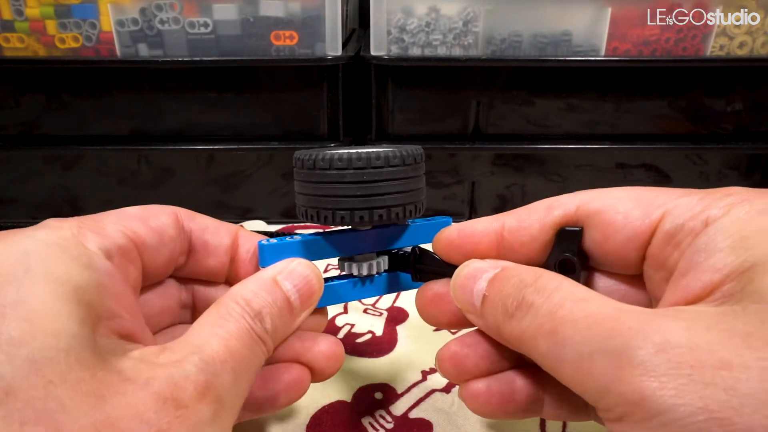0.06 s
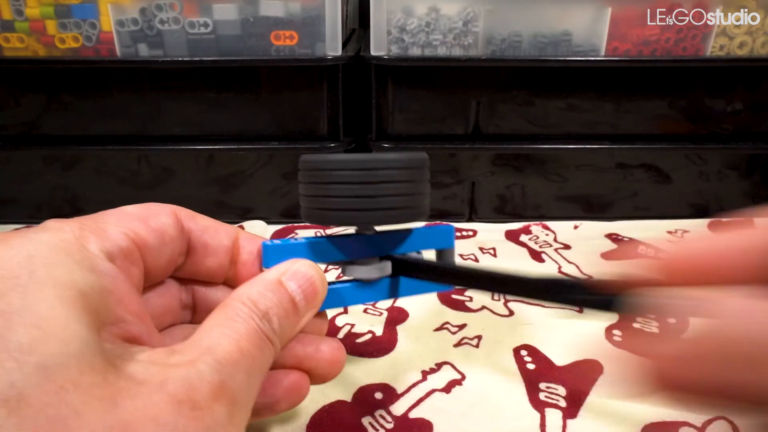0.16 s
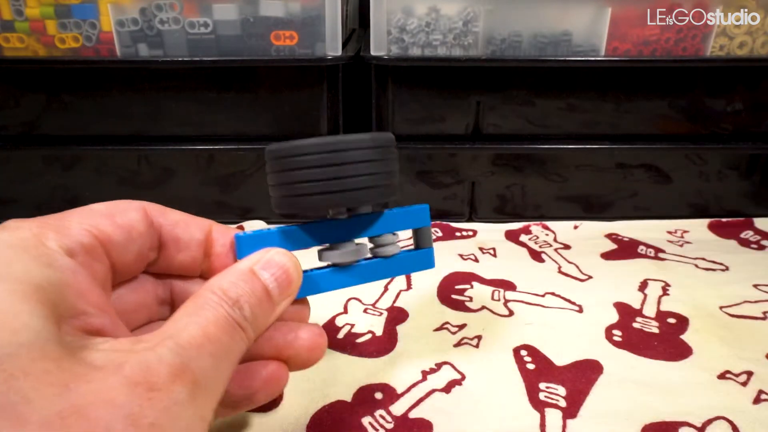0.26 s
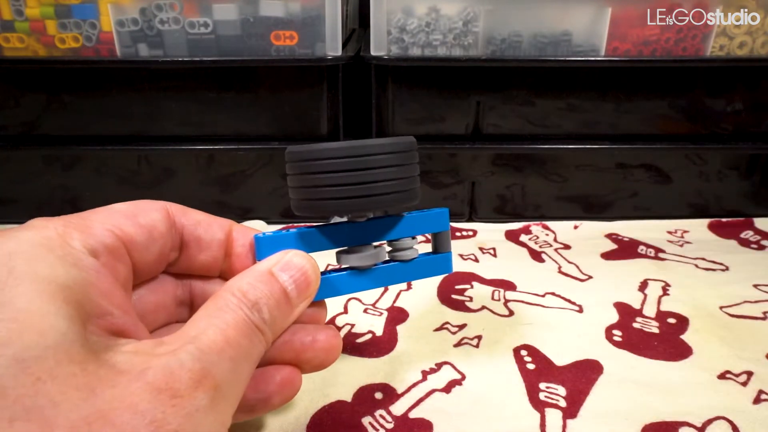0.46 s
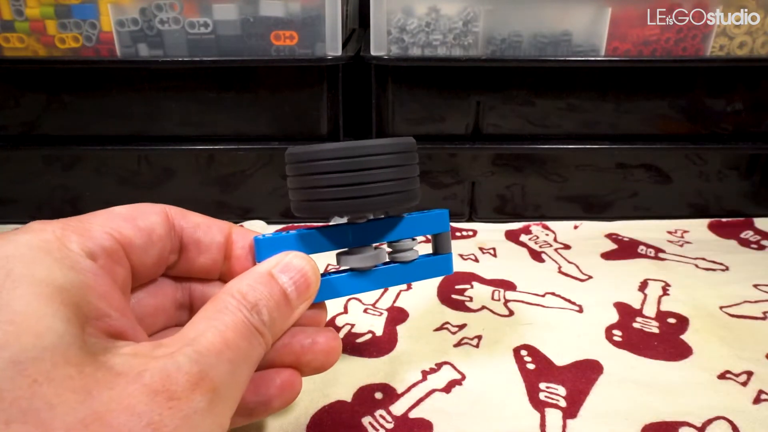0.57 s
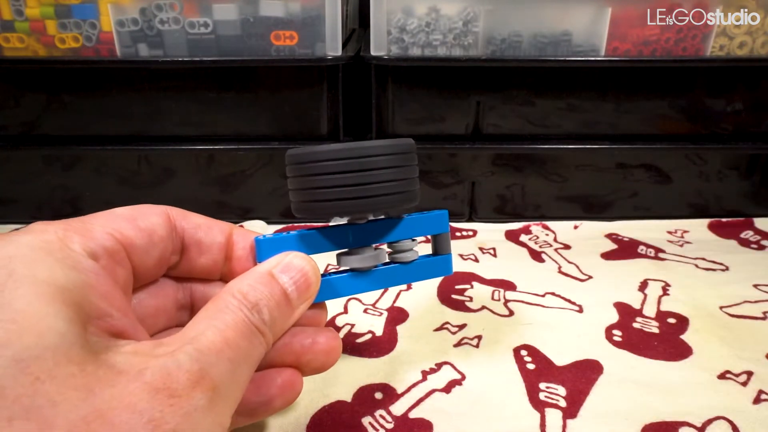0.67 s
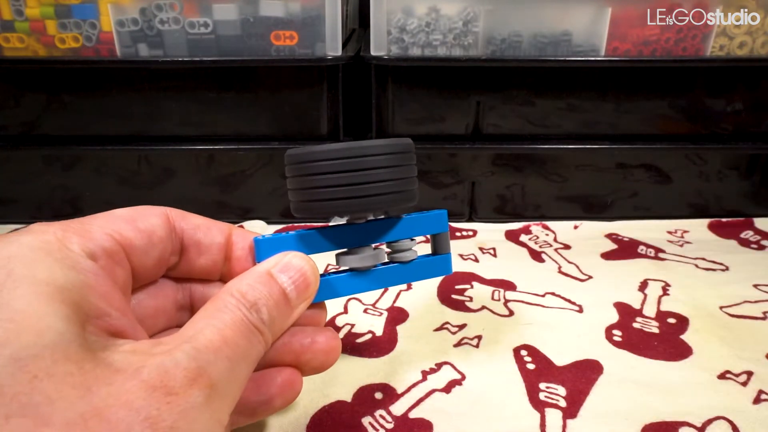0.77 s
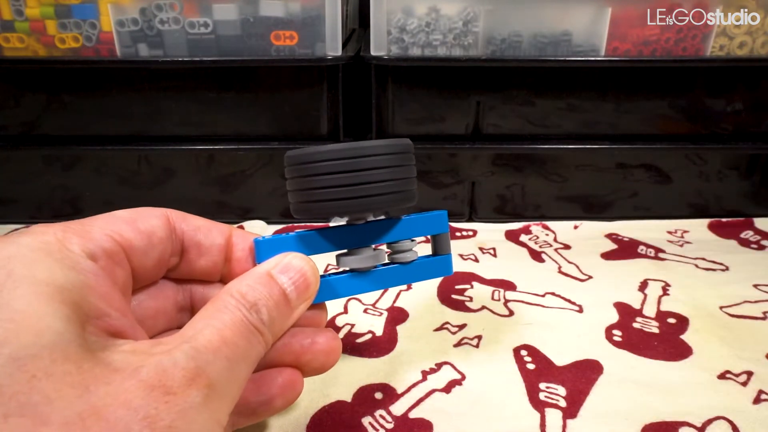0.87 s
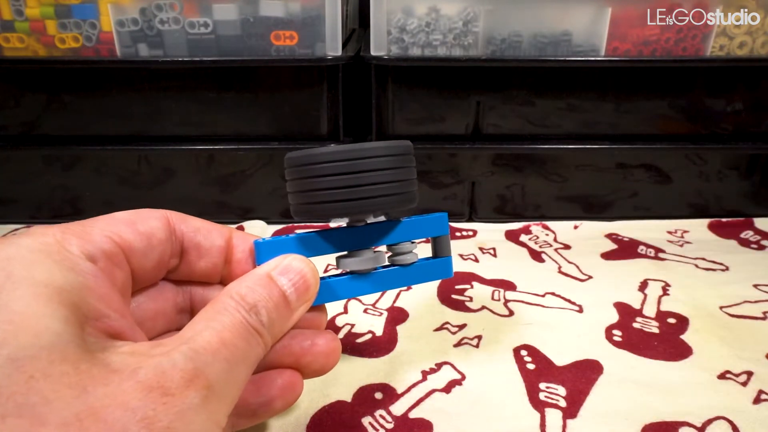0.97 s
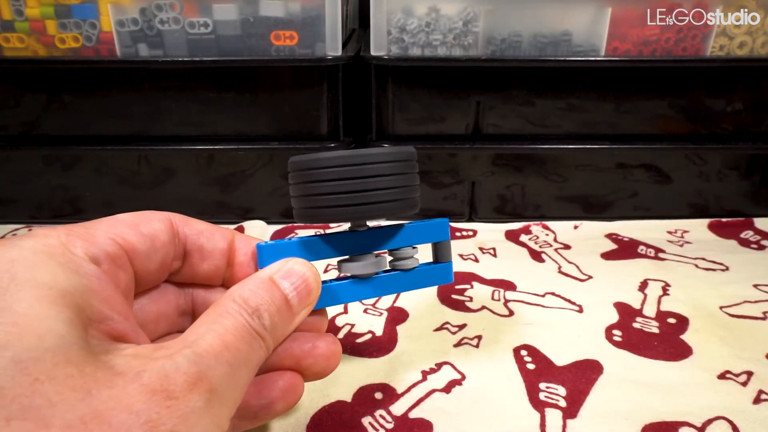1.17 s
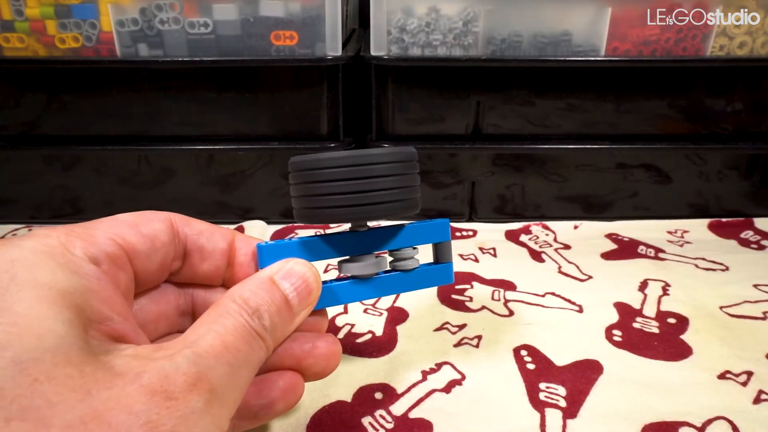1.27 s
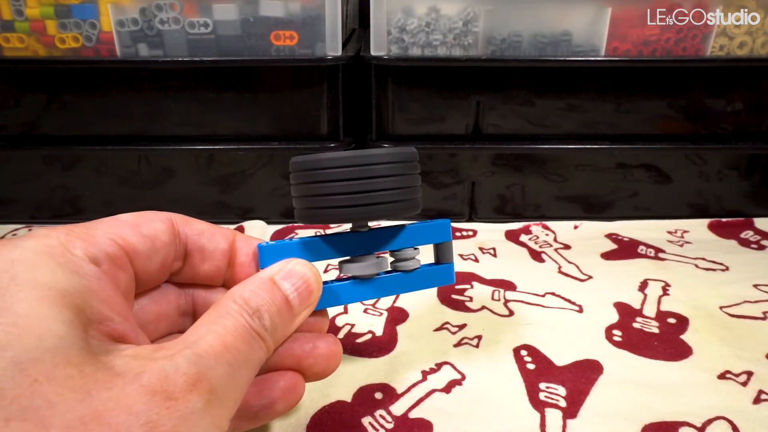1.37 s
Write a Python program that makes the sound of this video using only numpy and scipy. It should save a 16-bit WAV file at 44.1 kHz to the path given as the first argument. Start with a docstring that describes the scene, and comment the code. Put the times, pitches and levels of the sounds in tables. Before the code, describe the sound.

Plastic toy gears zip up fast, then a sharp click and steady rattling whir.

```python
"""A toothed plastic cord is yanked through the gears of a hand-held toy, close by in a small room.
Its teeth zip over a small gear ever faster; it comes free, and a sharp ringing click follows.
The wheel spins on, its loose gears chattering on every turn, while the hand bumps softly on the frame.
A low rumble and a faint hiss lie underneath."""
import sys
import numpy as np
from scipy import signal
from scipy.fft import rfft, irfft, next_fast_len
from scipy.io import wavfile

SR = 44100
rng = np.random.default_rng(int(sys.argv[2]) if len(sys.argv) > 2 else 0)


def wav_record(signal):
    """Record a signal, one row per channel, as 16-bit PCM in the file named by sys.argv[1]."""
    frames = np.transpose(np.atleast_2d(signal))
    bounded = np.clip(frames, -1, 1)
    # unit amplitude maps onto the largest positive 16-bit level
    quanta = np.round(bounded * 32767).astype(np.int16)
    wavfile.write(sys.argv[1], SR, quanta)


N = 61739
T = np.arange(N) / SR

# How strong the low and high pitches are in each sound: pitch_hz, level_db
RUMBLE_TONE = [(22, -39), (42, -0.5), (65, -5), (120, 2.5), (195, 3), (270, -4), (450, -7.5), (700, -7.5),
               (1500, -15.5), (4000, -36.5)]
HISS_TONE = [(100, -16.5), (600, -5), (1500, -12), (4000, -17.5), (15000, -22.5)]
SPIN_TONE = [(100, -30.5), (300, -7.5), (500, -6.5), (800, 5), (1150, -7.5), (1700, 1), (2600, -2),
             (3500, 0.5), (4800, -2), (5700, -3), (7200, -1.5), (8400, 2), (9300, -3), (10100, -2.5),
             (10800, -4), (13000, -9.5), (15500, -7.5)]
CLICK_TONE = [(300, -28), (1000, -14), (2400, -6), (3600, -16), (5600, -4), (8000, -3), (10300, 4),
              (12000, -6), (15500, -3)]
CLATTER_TONE = [(300, -25), (750, -5.5), (1030, 10), (1400, 1), (2200, 7), (3200, -2), (4200, 1.5),
                (7000, -5.5), (14000, -14.5)]
SLACK_TONE = [(80, -14), (220, 3), (450, -4.5), (850, -2), (1300, -11), (2000, -4.5), (3000, -23.5),
              (4600, -7.5), (7000, -34.5), (15000, -34)]
SKID_TONE = [(2000, -67), (6000, 19.5), (10000, 19.5), (13300, 18), (16000, 3.5)]
ZIP_TONE = [(50, -14), (100, -7.5), (200, -6.5), (330, -22), (560, -14), (760, 3), (900, 1.5), (1110, -9.5),
            (1400, 1), (2300, -3.5), (2750, 2), (3500, -3), (4370, 4.5), (5800, 4.5), (8900, -1),
            (10100, -0.5), (12000, -3), (13300, 2.5), (15500, -10.5)]

# The notes of the axle and the gears, each fading 60 dB in ring_s: pitch_hz, level_db, ring_s
AXLE_NOTES = [(778, -5, 0.042), (925.7, 1.5, 0.0202), (1575.6, 3, 0.075), (1937.5, 5, 0.00934),
              (3500, 4, 0.075), (4481, 1, 0.039), (5224, 4.5, 0.0424), (6952, 4, 0.054),
              (7484, 9.5, 0.00667), (7945, 1.5, 0.035), (10061, 5, 0.028)]
GEAR_NOTES = [(2740, -4, .04), (3263, -2, .07), (3937, 0, .07), (4283, -1, .06), (4616, -5, .06),
              (4974, -4, .04), (5829, -1, .05), (6615, -2, .04), (10785, -6, .05), (13306, -4, .04)]
# The click's thin, high ring lingering in the room: pitch_hz, level_db, ring_s
LINGERING_RING = [(1044, -10, .45), (10235, -1, .33), (10280, 0, .28), (10372, 1, .32), (10668, -1, .32),
                  (10790, -10, .32), (11320, -10, .32)]

# The hand bumps the frame: start_s, level_db, pitch_hz, fade_s
HAND_BUMPS = [(.245, -45, 165, 0.012), (0.276, -35, 321, 0.0085), (.44, -43.5, 126.1, 0.0219),
              (0.443, -48, 267.6, 0.053), (1.092, -44, 109, 0.014), (1.229, -47, 278, 0.063),
              (1.234, -54, 91.94, 0.253)]
# The frame is knocked: start_s, level_db
FRAME_KNOCKS = [(1.229, -37), (1.2585, -43)]
# Single teeth catch harder: start_s, level_db, pitch_hz
TOOTH_CATCHES = [(.5655, -32.5, 6790), (.583, -43.5, 7420), (.607, -51.5, 7100), (.64, -34, 4547),
                 (.697, -45.5, 7000), (.7015, -37, 7000), (0.741, -36, 7103), (0.7757, -35, 3535),
                 (.808, -59, 3500), (0.9005, -57.5, 7160), (.9615, -38.5, 3573), (.979, -49.5, 3562),
                 (1.039, -43.5, 3570), (1.1015, -38, 3560), (1.386, -36.5, 4729)]
# The wheel spins freely: time_s, turns_per_s, level_db
WHEEL_SPIN = [(.28, 66, -82.5), (.288, 66, -42.5), (.308, 66, -36.5), (.36, 66, -44.5), (.45, 65.5, -43),
              (.53, 65.2, -45), (.575, 68.34, -41.5), (.66, 57.7, -42.5), (.71, 65, -42),
              (.92, 70.13, -41.5), (1.07, 63.33, -42), (1.16, 64.7, -42), (1.4, 62.76, -43)]
# The freed cord's first touch, main hit and rebound: start_s, level_db, fade_s
CORD_HITS = [(.3765, -14.5, .0004), (.3771, -12, .0007), (.3842, -29, .003)]
# The note of the cord's free end: time_s, pitch_hz, level_db
CORD_CHIRP = [(.243, 2069, -69.5), (.256, 2702, -25.5), (.263, 3396, -25.5), (.269, 4359, -17.5),
              (.279, 5580, -57.5)]
# The cord's teeth skid hard: start_s, length_s, level_db
TOOTH_SKIDS = [(.209, .022, -37), (.2655, .007, -20), (.279, .004, -20.5)]
# The pull on the cord: time_s, teeth_per_s, level_db
CORD_PULL = [(.176, 160.6, -74.5), (.183, 250, -44.5), (.205, 401, -30.5), (.215, 531.5, -25),
             (.239, 572, -19.5), (.246, 730, -20.5), (.256, 760, -19.5), (.268, 890, -17.5),
             (.281, 910, -23), (.285, 1072.5, -21)]

ECHO_S = .003   # time scale of the nearest echoes
ZIP_PAN_DB, SPIN_PAN_DB = -.6, .06   # above zero leans left, below zero leans right


def from_db(db):
    """Turn decibels into a number to multiply by."""
    return 10 ** (np.asarray(db) / 20)


def rms_one(x):
    """Scale a sound so its average power is 1."""
    return x / np.sqrt(np.mean(x ** 2) + 1e-20)


def in_time(rows):
    """Join a table's points with straight lines, giving each column at every sample."""
    times, *columns = np.transpose(rows)
    return [np.interp(T, times, column) for column in columns]


def fade(start_s, fade_s):
    """A level that starts suddenly and dies away."""
    return (T >= start_s) * np.exp(-np.maximum(T - start_s, 0) / fade_s)


def blow(start_s):
    """A tap one sample long."""
    return 1. * (np.arange(N) == int(start_s * SR))


def let_through(x, kind, hz, order=2):
    """Keep the low pitches, the high ones or a band between."""
    return signal.sosfilt(signal.butter(order, hz, kind, fs=SR, output="sos"), x)


def colour(x, tone):
    """Shape a sound's low and high pitches with a tone table."""
    size = 2 * next_fast_len(N)
    hz, db = np.transpose(tone)
    grid_hz = np.maximum(np.arange(size // 2 + 1) * SR / size, 1)
    gain = rms_one(from_db(np.interp(np.log(grid_hz), np.log(hz), db)))
    # folding keeps the filter from sounding before a hit arrives
    fold = np.r_[1, np.full(size // 2 - 1, 2), 1, np.zeros(size // 2 - 1)]
    response = np.exp(rfft(irfft(np.log(gain)) * fold))
    return irfft(rfft(x, size) * response)[..., :N]


def ring(x, hz, ring_s):
    """Each tap starts a pure note that fades 60 dB in ring_s."""
    shrink = np.exp(-np.log(1000) / (ring_s * SR))
    angle = 2 * np.pi * hz / SR
    return signal.lfilter([0, np.sin(angle)], [1, -2 * shrink * np.cos(angle), shrink ** 2], x + 1e-18)


def tooth_hits(teeth_per_s, jitter, spread_db, scrape_s, snap):
    """Each tooth makes a snap and a short scrape, a little uneven in timing and strength."""
    passed = np.cumsum(teeth_per_s) / SR
    teeth = np.arange(1, int(passed[-1]))
    timing, strength = rng.standard_normal((2048, 2))[:len(teeth)].T
    at = np.interp(teeth + jitter * timing, passed, np.arange(N)).astype(int)
    hits = np.zeros(N)
    hits[at] = from_db(spread_db * np.clip(strength, -2, 2))
    scrapes = signal.lfilter([1], [1, -np.exp(-1 / (scrape_s * SR))], hits) * rng.standard_normal(N)
    snaps = hits - hits[at].mean() * teeth_per_s / SR   # centred on zero
    return rms_one(scrapes + snap * snaps)


def in_room(x, pan_db, room_db=-4.5):
    """Place a sound left or right, with bright echoes off table and hands, then the room's echo."""
    delay_s, low_ring_s, treble_ring_s = .0052, .1414, .572
    noise = rng.standard_normal((3, N))
    early = rms_one(noise[2] * fade(ECHO_S / 10, ECHO_S)) / np.sqrt(N)
    early = let_through(early, "high", hz=2400, order=1)
    air = let_through(noise[:2], "high", hz=600, order=1)
    low = let_through(air, "low", hz=7000)
    tail = low * fade(delay_s, low_ring_s / np.log(1000))
    tail += (air - low) * fade(delay_s, treble_ring_s / np.log(1000))
    near = x + from_db(-1.2) * signal.fftconvolve(x, early)[:N] * [[1], [-1]]
    far = signal.fftconvolve(x[None], rms_one(tail) / np.sqrt(N), axes=1)[:, :N]
    return near * from_db([[pan_db], [-pan_db]]) + from_db(room_db) * far


def background():
    """Low room rumble and a faint hiss."""
    rumble = from_db(-52.5) * colour(rng.standard_normal(N), RUMBLE_TONE)
    hiss = from_db(-59) * colour(rng.standard_normal((2, N)), HISS_TONE)
    return rumble + hiss


def hand_bumps():
    """The hand makes dull, short thuds in the frame."""
    out = np.zeros(N)
    for start_s, db, hz, fade_s in HAND_BUMPS:
        shape = fade(start_s, fade_s)
        thud = let_through(shape * rng.standard_normal(N), "band", [hz / 1.682, hz * 1.682])
        out += from_db(db) * np.sqrt(np.mean(shape ** 2)) * rms_one(thud)
    return out


def frame_knocks():
    """The knocked frame booms with one round, low note."""
    taps = sum(from_db(db) * blow(start_s) for start_s, db in FRAME_KNOCKS)
    return ring(taps, hz=272, ring_s=.16)


def catching_teeth():
    """Now and then a tooth catches and rings one note of the axle."""
    out = np.zeros(N)
    for start_s, db, hz in TOOTH_CATCHES:
        burst = from_db(db) * fade(start_s, fade_s=.00078) * rng.standard_normal(N)
        note = burst.std() * rms_one(ring(burst, hz, ring_s=.031))
        out += colour(burst, SPIN_TONE) + note
    return in_room(out, SPIN_PAN_DB)


def spinning_wheel():
    """Loose gears chatter and ring the axle, harder once a turn as the wheel wobbles."""
    gear_teeth, wobble_db = 12, 2.6
    turns_per_s, spin_db = in_time(WHEEL_SPIN)
    wobble = np.sin(2 * np.pi * np.cumsum(turns_per_s) / SR)
    force = from_db(spin_db + wobble_db * wobble) * (T > WHEEL_SPIN[0][0])

    def chatter():
        hits = tooth_hits(turns_per_s * gear_teeth, jitter=.25, spread_db=3.3, scrape_s=.0011, snap=1.8)
        return force * hits

    teeth = chatter()
    # each note is struck by the shared teeth plus fresh chatter of its own
    notes = sum(from_db(db) * rms_one(ring(teeth + chatter(), hz, ring_s))
                for hz, db, ring_s in AXLE_NOTES)
    axle = from_db(-6) * teeth.std() * rms_one(notes)
    return in_room(from_db(-2.5) * colour(teeth, SPIN_TONE) + axle, SPIN_PAN_DB)


def hollow_clatter():
    """A hollow clatter swells behind the click."""
    start_s = .3634
    swell = fade(start_s, fade_s=.0456) - fade(start_s, fade_s=.0218)
    return from_db(-25) * colour(swell * rng.standard_normal(N), CLATTER_TONE)


def cord_click():
    """The freed cord cracks on the right, pings and rebounds; a thin ring lingers in the room."""
    pan_db = -6
    hit_s, rebound_s = CORD_HITS[1][0], CORD_HITS[2][0]
    shape = sum(from_db(db) * fade(start_s, fade_s) for start_s, db, fade_s in CORD_HITS)
    crack = colour(shape * rng.standard_normal(N), CLICK_TONE)
    taps = blow(hit_s) + from_db(-14) * blow(rebound_s)
    ping = from_db(-18.5) * ring(taps, hz=10400, ring_s=.04)
    ears = from_db([[pan_db], [-pan_db]]) * [[-1], [1]]   # the left ear's ping is half a wave late
    lingering = np.zeros((2, N))
    for ear in lingering:
        for hz, db, ring_s in LINGERING_RING:
            ear += from_db(db - 29.5) * ring(blow(hit_s + ECHO_S * rng.random()), hz, ring_s)
    clatter = hollow_clatter()
    click = in_room(crack, pan_db, room_db=-10) + ping * ears + lingering
    return click + in_room(clatter, pan_db=-1.5, room_db=-10)


def slack_scrape():
    """The gears take up the slack with a low scrape as the cord tightens."""
    scrape = fade(start_s=.179, fade_s=.07) * rng.standard_normal(N)
    return in_room(from_db(-42.5) * colour(scrape, SLACK_TONE), ZIP_PAN_DB)


def cord_end():
    """The cord's free end rings higher as it shortens: a quick, rough chirp."""
    hz, db = in_time(CORD_CHIRP)
    flutter, grit = let_through(rng.standard_normal((2, N)), "low", hz=320)
    angle = 2 * np.pi * np.cumsum(hz) / SR
    note = (1 + .5 * rms_one(flutter)) * np.sin(angle) + .5 * rms_one(grit) * np.cos(angle)
    return from_db(db) * (T > CORD_CHIRP[0][0]) * (T < CORD_CHIRP[-1][0]) * rms_one(note)


def cord_zip():
    """The cord's teeth strike the small gear faster and harder, skidding at times, until it comes free."""
    teeth_per_s, pull_db = in_time(CORD_PULL)
    force = from_db(pull_db) * (T > CORD_PULL[0][0]) * (T < CORD_PULL[-1][0])
    teeth = force * tooth_hits(teeth_per_s, jitter=.04, spread_db=2, scrape_s=.0012, snap=3)
    rasp = from_db(-1.5) * colour(teeth, ZIP_TONE)
    notes = sum(from_db(db) * rms_one(ring(teeth, hz, ring_s)) for hz, db, ring_s in GEAR_NOTES)
    gears = from_db(-12) * teeth.std() * rms_one(notes)
    skidding = sum(from_db(db) * (T > start_s) * (T < start_s + length_s)
                   for start_s, length_s, db in TOOTH_SKIDS)
    skids = colour(skidding * rng.standard_normal(N), SKID_TONE)
    return in_room(rasp + gears + skids + cord_end(), ZIP_PAN_DB)


def scene():
    """Zip, click and whirr over the quiet room."""
    toy = slack_scrape() + cord_zip() + spinning_wheel() + catching_teeth() + cord_click()
    return toy + hand_bumps() + frame_knocks() + background()


def record(dry):
    """Cut away the very highest treble."""
    cutoff_hz = 15800
    return signal.sosfilt(signal.ellip(12, .1, 80, cutoff_hz, fs=SR, output="sos"), dry)


dry = scene()
out = record(dry)
wav_record(out)
```